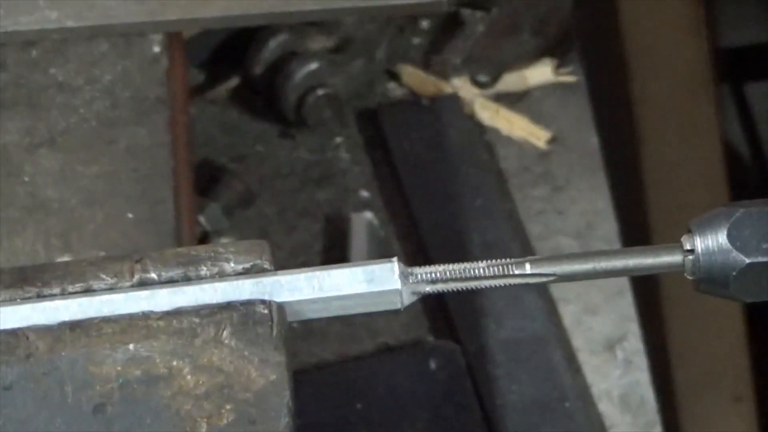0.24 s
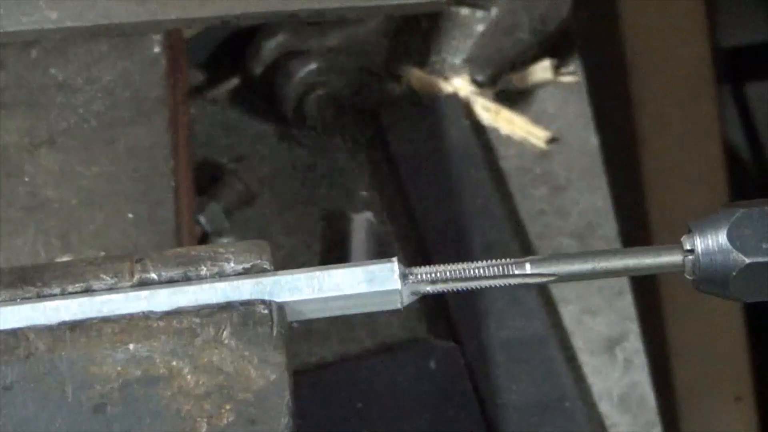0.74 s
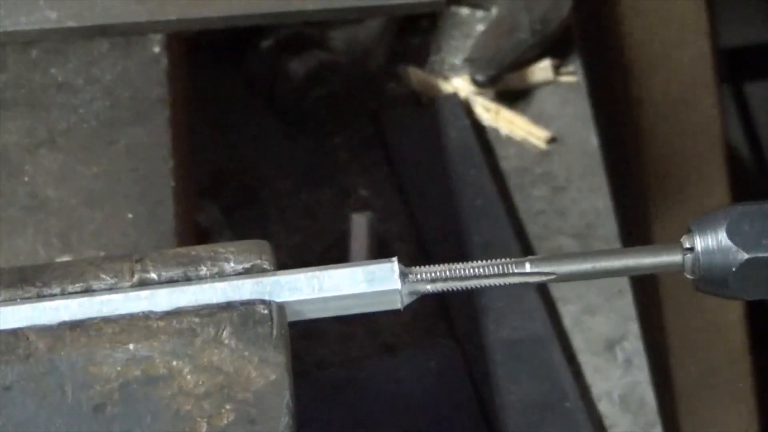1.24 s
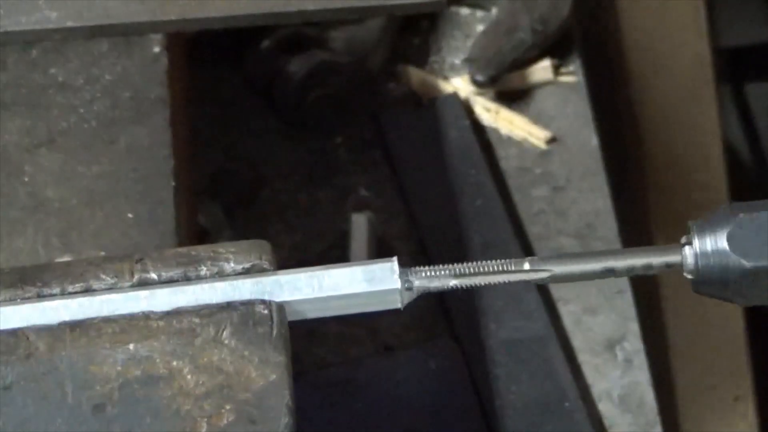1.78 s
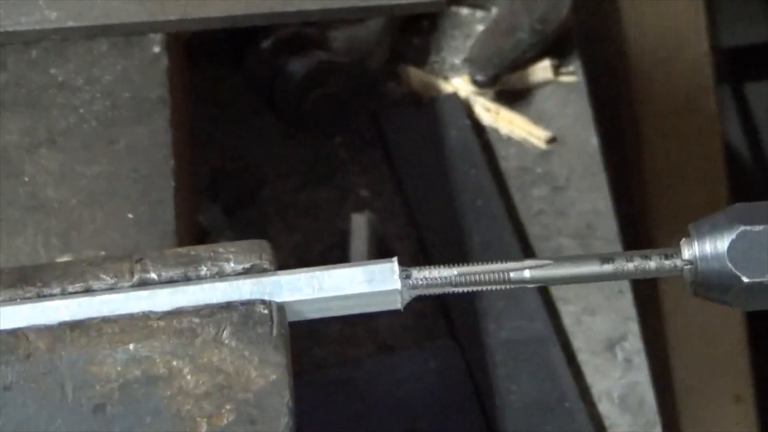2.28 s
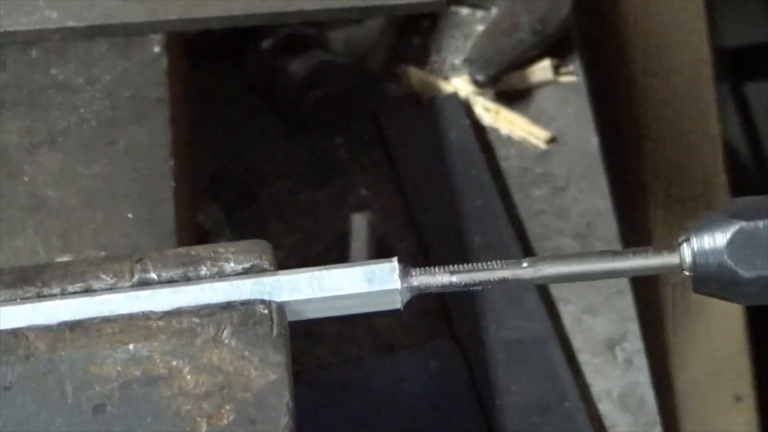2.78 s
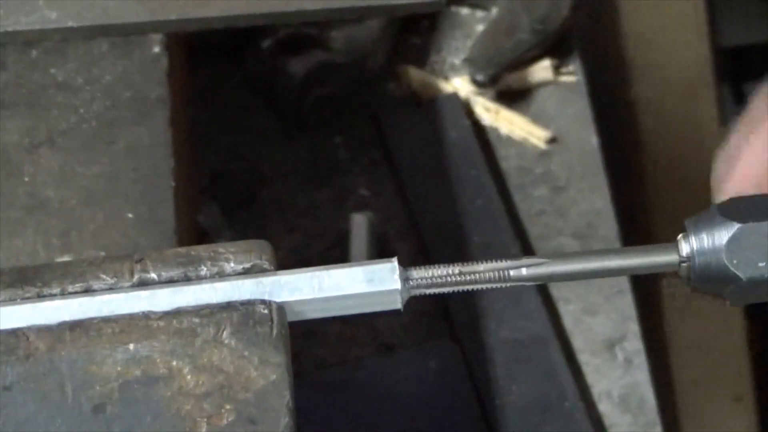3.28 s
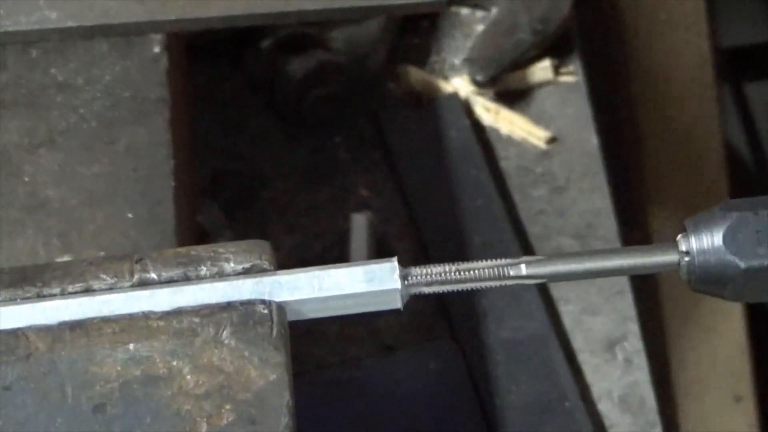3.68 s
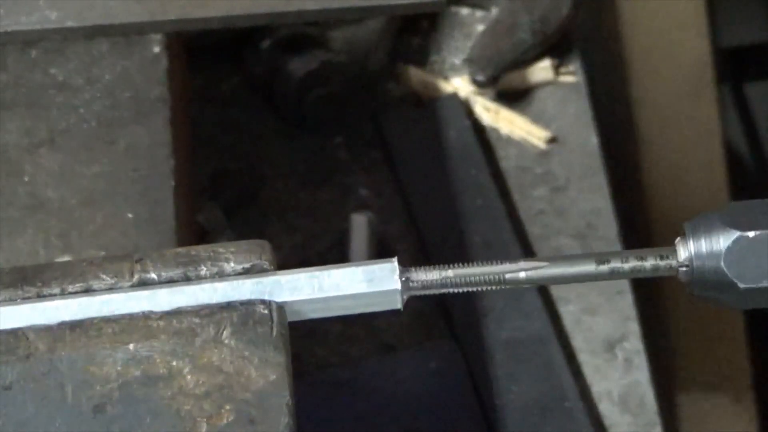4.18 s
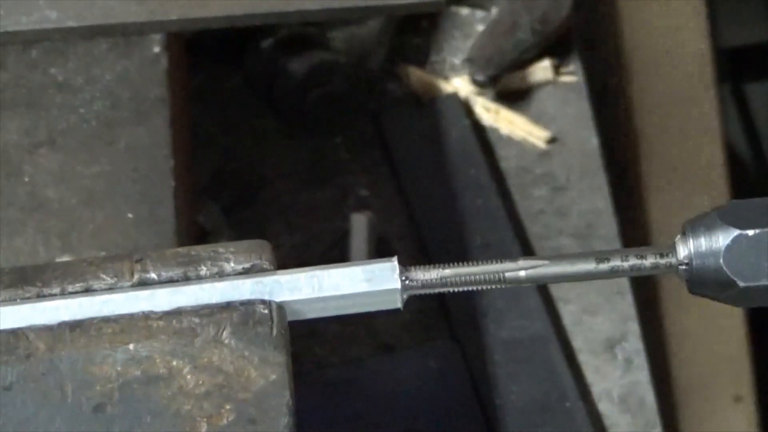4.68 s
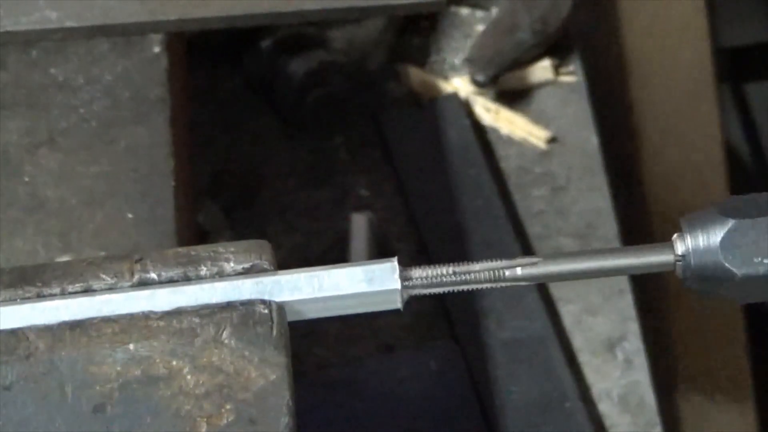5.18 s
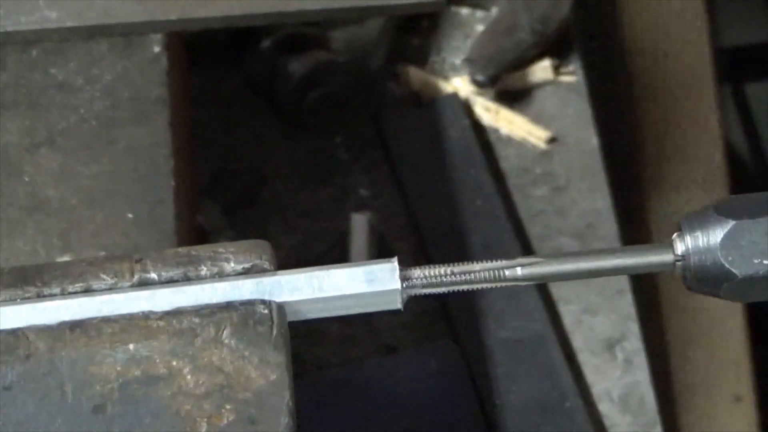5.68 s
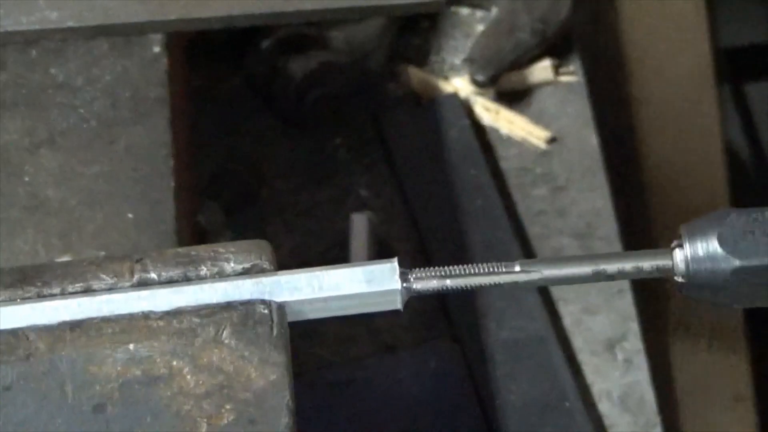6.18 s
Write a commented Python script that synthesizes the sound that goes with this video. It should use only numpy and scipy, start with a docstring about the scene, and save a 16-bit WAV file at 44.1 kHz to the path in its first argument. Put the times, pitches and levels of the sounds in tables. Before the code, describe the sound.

A dense burst of heavy steel clunks and bright clacks rings on a bench and vise in a live workshop, fading within half a second. A brief dry scrape swells and stops just after one second. Then a hand tap turns slowly in a steel rod: very quiet wrench knocks, small pings and chip snaps, over steady hiss and faint low rumble. Close stereo pickup, slightly dulled at the very top.

```python
"""Steel clunks and clatters on a workshop bench, as a hand tap is turned into a rod held in a vise.
Blows are fading coloured noise plus ringing modes; a dry slide is filtered grit, growing louder and brighter.
Then small sounds: the wrench knocks and the tap pings (runs of catches through modes), chips snap,
the flutes rub, the tap squeals. A drone, a low rumble, a hiss and a faint hum lie underneath."""
import sys
import numpy as np
from scipy import signal
from scipy.fft import rfft, irfft, next_fast_len
from scipy.io import wavfile
from scipy.ndimage import uniform_filter1d

SR = 44100
rng = np.random.default_rng(int(sys.argv[2]) if len(sys.argv) > 2 else 0)


def persist_wave(psi):
    """Save psi, clipped to +-1, as 16-bit WAV."""
    counts = np.round(np.clip(psi, -1, 1) * 32767).astype(np.int16)
    wavfile.write(sys.argv[1], SR, np.atleast_2d(counts).T)


N = 283915
T = np.arange(N) / SR
HIT_T = T[:SR // 2]

# heavy blows on the bench: (time [s], level [dB], treble tilt [dB/octave])
BLOWS = [(0.0003, -15, 0), (0.0045, -19.5, 0), (0.0085, -17.5, -1), (0.033, -24.5, -2.5),
         (0.062, -31.5, -0.5), (0.085, -29.5, -2), (0.104, -31, -1), (0.1114, -26, -1.5),
         (0.126, -27.5, -0.5), (0.141, -29, -1.5), (0.176, -36.5, -3), (0.201, -39, -1)]
# spectrum of a blow's crack: (frequency [Hz], level [dB])
BENCH_COLOUR = [(40, -37), (90, -16), (130, -10), (190, -15), (290, -5.5), (500, -10), (680, -9),
                (860, -10.5), (1100, -11.5), (1800, -8.5), (3200, -11), (6500, -12.5), (8500, -17.5),
                (11000, -33)]
# bench and vise modes: (frequency [Hz], level [dB], t60 [s])
BENCH_MODES = [(262.7, 7, 0.099), (335, -4.5, 0.14), (440, -9, 0.3), (650, -2, .11), (736, -11.5, .12),
               (1058, 0, 0.112), (1552, 0.5, 0.12), (1728, -2, 0.085), (2104, -4.5, .09),
               (2370, -0.5, 0.1013), (2680, -13, .12), (4290, -7.5, 0.13), (4510, -10.5, .14),
               (5270, -9, .12), (6365, -8.5, .14)]
# a harder blow rings the bench more: ring relative to crack for a blow of HARD_DB, and its change per dB
HARD_DB, BLOW_RING_DB, RING_DB_PER_DB = -16.5, -2, 0.9
BLOW_CRACK_T60_S = 0.11
# bench shudders at each landing: (time [s], level [dB])
SHUDDERS = [(0.0, -33), (0.106, -28.5)]
# shudder spectrum: (frequency [Hz], level [dB])
SHUDDER_COLOUR = [(60, -39.5), (135, -7.5), (200, -12), (280, -7.5), (360, -0.5), (450, -3), (560, -6.5),
                  (690, -6), (880, -15.5), (1050, -8), (1500, -19), (2500, -44.5)]
SHUDDER_ATTACK_S, SHUDDER_T60_S = 0.016, 0.39
# lean of the clatter: (frequency [Hz], left minus right [dB])
CLATTER_LEAN = [(190, -1), (340, -0.5), (600, 3), (1060, 0.5), (1900, 0), (6000, 0)]

# hard steel-on-steel clacks: (time [s], level [dB], ring relative to crack [dB], crack t60 [s])
CLACKS = [(0.1122, -30, -6.5, 0.02), (0.128, -27, -16, 0.024), (0.1782, -34, -20, 0.036),
          (0.2356, -32, -18, 0.026), (0.2454, -24, -12, 0.032), (0.2478, -31.5, -12, 0.21)]
# clack spectrum: (frequency [Hz], level [dB])
CLACK_COLOUR = [(150, -25), (300, -10), (700, -10), (1000, -7), (1400, -2.5), (1720, -10.5), (2000, 0.5),
                (2400, -9), (3050, -3.5), (3900, -10), (5500, -4.5), (6600, -6.5), (7800, -0.5),
                (11000, -25.5)]
# clacking steel modes: (frequency [Hz], level [dB], t60 [s])
STEEL_MODES = [(678, -9, 0.13), (1990, 5, 0.088), (2120, -4, 0.33), (2950, -18, 0.16), (3180, -11, 0.14),
               (4460, -5, 0.21), (5660, -5.5, 0.43), (7350, -7, .05), (7900, 3, 0.058)]

# dry sliding strokes: (start [s], length [s], final level [dB], final brightness [dB])
STROKES = [(0.632, 0.05, -56, -2.5), (1.011, .208, -38.7, .5)]
# scrape spectrum: (frequency [Hz], level [dB])
SLIDE_COLOUR = [(150, -45), (300, -28), (470, -22), (560, -11), (800, -11), (950, -7.5), (1300, -8),
                (1750, -3.5), (2200, -3), (2700, -1), (4200, -5.5), (4700, -7), (6100, -7), (8500, -13),
                (9400, -17.5), (11000, -24)]
# a stroke grips at once, grows louder and brighter as it speeds up, then runs out
GRIP_S, CLIMB_DB_PER_S, RUN_OUT_T60_S, BRIGHTEN_DB_PER_S = 0.016, 46, 0.31, 6

# wrench handle knocking in its play: (time [s], level [dB], contact time [s])
KNOCKS = [(0.766, -59, 0.018), (0.816, -67, .015), (0.899, -55, 0.019), (2.031, -55, 0.032),
          (2.1425, -50, .027), (2.232, -57, .027), (3.154, -60, 0.011), (3.3665, -50, .021),
          (3.463, -61, 0.011), (4.16, -54.5, .027), (4.379, -62, .016), (4.442, -59, .003),
          (5.268, -57, .025), (5.467, -53.5, .007), (5.541, -64, .012), (5.881, -64, .02),
          (6.426, -57.5, .013)]
# wrench modes before tilt: (frequency [Hz], level [dB], t60 [s])
WRENCH_MODES = [(1460, -10, 0.057), (1510, -3, 0.11), (1583, 2, 0.07), (1736, -1, 0.08), (1860, 2.5, 0.055),
                (2040, 2, 0.029), (2345, -11, 0.17), (2900, -8.5, 0.12), (4280, -20, 0.034),
                (7550, -20, .03)]
# tap freeing itself: (time [s], level [dB], contact time [s])
PINGS = [(1.664, -66.5, 0.02), (1.835, -64.5, 0.01), (2.6854, -55, .005), (2.885, -66, .023),
         (2.935, -66.5, .015), (3.154, -65, .005), (3.3655, -54, .0005), (3.7652, -61.5, .003),
         (3.925, -69.5, 0.018), (4.164, -63, .014), (5.0615, -55, .003), (5.139, -66, .003),
         (5.463, -61, .008), (5.885, -68, .002)]
# tap modes before tilt: (frequency [Hz], level [dB], t60 [s])
TAP_MODES = [(4320, -3, 0.041), (4342, -2.5, 0.029), (6910, -13, .025), (7900, -8, 0.03), (9600, -19, .025)]
# spectrum of the dry rattle after a slip, before tilt: (frequency [Hz], level [dB])
RATTLE_COLOUR = [(300, -38), (1150, -17), (1550, 1), (2200, -1.5), (3300, -8), (4400, -5), (6200, -12),
                 (7700, -1.5), (9000, -20), (11000, -28)]
REFERENCE_CONTACT_S = 0.01

# chips snapping: (time [s], level [dB], ring relative to crack [dB], crack t60 [s])
SNAPS = [(0.529, -63, 5, .02), (1.0298, -47, -13, 0.004), (1.529, -56, -18, 0.011),
         (5.7325, -59.5, 2.5, 0.024)]
# snap spectrum: (frequency [Hz], level [dB])
SNAP_COLOUR = [(500, -19), (2000, -11), (3000, 8), (5000, 5), (8000, 9), (11000, -6)]
# chip modes: (frequency [Hz], level [dB], t60 [s])
CHIP_MODES = [(2570, 29, 0.027), (2540, -23, .04), (3500, 9, 0.087), (7500, -28, .03)]

# tap binding and singing: (start [s], length [s], level [dB])
SQUEALS = [(2.633, .11, -71), (4.865, .28, -71.5)]
SQUEAL_HZ, SQUEAL_EDGE_S = 4340, 0.03
# flutes rubbing thinly in the hole: (time [s], level [dB], length [s])
RUBS = [(2.139, -66, 0.087), (2.545, -70, 0.039), (3.16, -70, .035)]
# flute rub spectrum: (frequency [Hz], level [dB])
RUB_COLOUR = [(6000, -23), (6850, -7), (7100, -14), (7550, 1), (7950, -23), (9000, -37)]

# soft rubbing as the wrench goes round: (frequency [Hz], level [dB])
BRUSH_COLOUR = [(150, -23), (260, -3), (350, 0.5), (560, -8.5), (780, -1.5), (1100, -12), (2500, -27)]
BRUSH_START_S, BRUSH_LENGTH_S, BRUSH_EDGE_S, BRUSH_DB = 2.364, 0.5, 0.17, -66.5
# faint squeak beside it; pitch rises and falls
SQUEAK_START_S, SQUEAK_LENGTH_S, SQUEAK_EDGE_S, SQUEAK_DB = 2.38, 0.26, 0.03, -80
SQUEAK_LOW_HZ, SQUEAK_HIGH_HZ, SQUEAK_PEAK_S, SQUEAK_WIDTH_S = 9150, 10030, 2.545, 0.07

# low drone; pitch rises and levels off
DRONE_START_S, DRONE_LENGTH_S, DRONE_EDGE_S, DRONE_DB = 2.38, 0.88, 0.27, -65.3
DRONE_FROM_HZ, DRONE_TO_HZ, DRONE_GLIDE_S = 52, 87, 0.32
# swells of dull rumble over a faint steady one: (start [s], length [s], level [dB])
RUMBLES = [(2.28, .24, -69.5), (3.18, 0.41, -65), (4.38, .22, -67.5), (5.35, .34, -67.5)]
# rumble spectrum: (frequency [Hz], level [dB])
RUMBLE_COLOUR = [(20, -22.5), (36, -6.5), (46, 0), (60, -2.5), (90, -15.5), (200, -47)]
RUMBLE_EDGE_S, RUMBLE_FLOOR_DB = 0.11, -79

# shop hiss spectrum: (frequency [Hz], level [dB])
AIR_COLOUR = [(15, -44), (25, -15), (54, -6.5), (124, -5), (152, -5), (235, -6.5), (372, -8), (492, -10),
              (840, -11), (1230, -14.5), (2270, -13.5), (2450, -15.5), (3410, -16), (4290, -15),
              (11000, -24), (14300, -58.5), (22000, -120)]
# humps on the hiss: (frequency [Hz], width [Hz], height [dB])
AIR_HUMPS = [(1200, 130, 5), (2482, 160, 6), (3130, 300, -0.5), (3770, 230, 2.5), (4900, 370, -1.5),
             (5570, 260, 7.5), (6400, 400, 0), (7950, 150, 3)]
AIR_DB = -62
# hum tones: (frequency [Hz], level [dB])
HUM = [(120, -77.5), (1030, -83)]

# room decay: (frequency [Hz], t60 [s])
ROOM_T60 = [(120, 1.28), (500, 0.63), (1300, 0.48), (2500, 0.82), (5500, 0.94), (8000, 1.03), (11000, 1.06)]
# room tail spectrum: (frequency [Hz], level [dB])
ROOM_COLOUR = [(100, -4.5), (500, -5), (1200, -4.5), (2200, 1.5), (3500, 1), (5500, 2.5), (6800, -0.5),
               (7800, -6.5), (9200, -2), (11000, -4)]
TOP_HZ = 11150


def undb(db):
    """Decibels to gain."""
    return 10 ** (np.asarray(db) / 20)


def unit(x):
    """Scale to rms 1."""
    return x / np.sqrt(np.mean(x ** 2))


def strength(x):
    """Scale a hit so that its energy equals that of 10 ms at rms 1."""
    return x / np.sqrt(np.sum(x ** 2, axis=-1).mean() / (SR / 100))


def at(points, hz):
    """Read (frequency, value) points on a log-frequency axis."""
    point_hz, value = np.transpose(points)
    return np.interp(np.log(hz + 1), np.log(point_hz), value)


def colour(x, points, tilt_db=0, humps=()):
    """Causal minimum-phase filter: spectrum, tilt per octave about 2 kHz, rounded humps."""
    size = next_fast_len(x.shape[-1] // 2 + 2048) * 2
    hz = np.fft.rfftfreq(size, 1 / SR)
    db = at(points, hz) + tilt_db * np.log2(np.maximum(hz, 300) / 2000)  # tilt is flat below 300 Hz
    db = db + sum(height_db * np.exp(-((hz - hump_hz) / width_hz) ** 2)
                  for hump_hz, width_hz, height_db in humps)
    # folding the cepstrum gives minimum phase
    cepstrum = irfft(np.log(undb(db)))
    cepstrum[1:size // 2] *= 2
    cepstrum[size // 2 + 1:] = 0
    response = np.exp(rfft(cepstrum))
    return irfft(rfft(x, size) * response)[..., :x.shape[-1]]


def fade(t_s, t60_s):
    """Exponential decay by 60 dB in t60."""
    return np.exp(-np.log(1000) * t_s / t60_s)


def swell(start_s, length_s, edge_s):
    """Attack, hold and release, with rounded edges."""
    from_edge_s = np.minimum(T - start_s, start_s + length_s - T)
    return np.sin(np.pi / 2 * np.clip(from_edge_s / edge_s, 0, 1))


def walk(rate_hz):
    """Slow random wander of rms 1: smoothed random steps."""
    step = int(SR / rate_hz)
    steps = np.repeat(rng.standard_normal(N // step + 1), step)
    return unit(uniform_filter1d(steps, step)[:N])


def tone(hz):
    """Sine of rms 1 following a varying frequency."""
    return unit(np.sin(2 * np.pi * np.cumsum(hz) / SR))


def spread(mid, side, side_db):
    """Left and right from mid and side."""
    return mid + undb(side_db) * side * np.array([[1], [-1]])


def add(out, time_s, sound):
    """Mix a sound in at its time."""
    i = max(int(time_s * SR), 0)
    out[:, i:i + sound.shape[-1]] += sound[..., :N - i]


def ring(modes, tilt_db=0, detune=0.0021):
    """Decaying modes, slightly detuned and random in sign at every contact."""
    hz, db, t60_s = np.transpose(modes)[:, :, None]
    hz = hz * (1 + detune * rng.standard_normal(hz.shape))
    sign = rng.choice([-1, 1], hz.shape)
    gain = sign * undb(db + tilt_db * np.log2(hz / hz[0]))
    return np.sum(gain * fade(HIT_T, t60_s) * np.sin(2 * np.pi * hz * HIT_T), axis=0)


def crack(points, t60_s, tilt_db=0, side_db=-12):
    """The crowd of short-lived modes that a blow wakes, as fading coloured noise."""
    noise = spread(*rng.standard_normal((2, len(HIT_T))), side_db)
    return strength(colour(noise * fade(HIT_T, t60_s), points, tilt_db))


def clatter():
    """Blows ring the bench and vise, which shudder on between them."""
    out = np.zeros((2, N))
    for time_s, db, tilt_db in BLOWS:
        ring_db = BLOW_RING_DB - RING_DB_PER_DB * (HARD_DB - db)
        ringing = undb(ring_db) * strength(ring(BENCH_MODES))
        cracking = crack(BENCH_COLOUR, BLOW_CRACK_T60_S, tilt_db, side_db=-8.5)
        add(out, time_s, undb(db) * (0 + strength(cracking + ringing)))
    out += shudder()
    left, right = out
    mid = (left + right) / 2
    # long waves reach both ears alike
    side = colour((left - right) / 2, [(60, -17), (200, -15), (700, -1.5)])
    return np.array([colour(mid + side, CLATTER_LEAN), mid - side])


def shudder():
    """Low coloured noise that builds up and dies away at each landing on the bench."""
    noise = spread(*rng.standard_normal((2, N)), side_db=-16)
    shaking = np.zeros(N)
    for time_s, db in SHUDDERS:
        attack = np.clip((T - time_s) / SHUDDER_ATTACK_S, 0, 1)
        decay = fade(np.maximum(T - time_s - SHUDDER_ATTACK_S, 0), SHUDDER_T60_S)
        shaking += undb(db) * attack * decay
    return unit(colour(noise, SHUDDER_COLOUR)) * shaking


def hard_hits(table, points, modes):
    """Short cracks, each with the ring of the metal."""
    out = np.zeros((2, N))
    for time_s, db, ring_db, t60_s in table:
        ringing = undb(ring_db) * strength(ring(modes))
        add(out, time_s, undb(db) * (crack(points, t60_s) + ringing))
    return out


def slide(grain_db=3.0):
    """Dense grit under a sliding surface, louder and brighter as it speeds up."""
    sizes = undb(grain_db * np.minimum(rng.exponential(size=N), 4))
    grains = spread(*(rng.standard_normal((2, N)) * sizes), side_db=-11.5)
    scrape = unit(colour(grains, SLIDE_COLOUR))
    low = signal.sosfilt(signal.butter(1, 3500, fs=SR, output="sos"), scrape)
    high = scrape - low
    out = np.zeros((2, N))
    for start_s, length_s, db, final_bright_db in STROKES:
        end_s = start_s + length_s
        to_go_s = np.clip(end_s - T, 0, length_s)
        grip = np.clip((T - start_s) / GRIP_S, 0, 1)
        climb = undb(db - CLIMB_DB_PER_S * to_go_s)
        run_out = fade(np.maximum(T - end_s, 0), RUN_OUT_T60_S)
        bright_db = final_bright_db - BRIGHTEN_DB_PER_S * to_go_s
        out += grip * climb * run_out * (low * undb(-bright_db) + high * undb(2 * bright_db))
    return out


def slips(table, modes, bright_db, dulling_db, rattle_db, rattle_t60_s, detune):
    """A quick run of tiny catches rings one steel part, with a dry rattle.

    Each doubling of contact time lowers the tilt by dulling_db per octave.
    """
    out = np.zeros((2, N))
    for time_s, db, contact_s in table:
        tilt_db = bright_db - dulling_db * np.log2(contact_s / REFERENCE_CONTACT_S)
        catches = rng.standard_normal(len(HIT_T)) * np.exp(-(HIT_T / contact_s) ** 2)
        ringing = signal.fftconvolve(catches, ring(modes, tilt_db, detune))
        body = strength(ringing[:len(HIT_T)])
        rattle = crack(RATTLE_COLOUR, rattle_t60_s + 4 * contact_s, tilt_db, side_db=-8)
        add(out, time_s, undb(db) * (body + undb(rattle_db) * rattle))
    return out


def squeal():
    """Steady friction keeps a low mode of the tap singing, a little unevenly."""
    hz = SQUEAL_HZ * (1 + 0.006 * walk(250))
    binding = sum(undb(db) * swell(start_s, length_s, SQUEAL_EDGE_S) for start_s, length_s, db in SQUEALS)
    return tone(hz) * binding * undb(2 * walk(60))


def rubs():
    """Brief thin rubs of the flutes: narrow-coloured noise."""
    out = np.zeros((2, N))
    for time_s, db, length_s in RUBS:
        envelope = signal.windows.tukey(int(length_s * SR), 0.5)
        noise = unit(colour(rng.standard_normal(len(envelope)), RUB_COLOUR))
        add(out, time_s, undb(db) * envelope * noise)
    return out


def brush(uneven_db=1.5):
    """Soft uneven rubbing of coloured noise with a thin arching squeak."""
    rubbing = unit(colour(rng.standard_normal(N), BRUSH_COLOUR)) * undb(BRUSH_DB)
    rubbing = rubbing * swell(BRUSH_START_S, BRUSH_LENGTH_S, BRUSH_EDGE_S)
    arch = np.exp(-((T - SQUEAK_PEAK_S) / SQUEAK_WIDTH_S) ** 2)
    squeak = tone(SQUEAK_LOW_HZ + (SQUEAK_HIGH_HZ - SQUEAK_LOW_HZ) * arch) * undb(SQUEAK_DB)
    squeak = squeak * swell(SQUEAK_START_S, SQUEAK_LENGTH_S, SQUEAK_EDGE_S)
    return (rubbing + squeak) * undb(uneven_db * walk(40))


def drone(waver_db=2.0):
    """One swell of a low wavering tone gliding up to its final pitch."""
    glide = np.exp(-np.maximum(T - DRONE_START_S, 0) / DRONE_GLIDE_S)
    hz = DRONE_TO_HZ + (DRONE_FROM_HZ - DRONE_TO_HZ) * glide
    hz = hz * (1 + 0.025 * walk(20))
    level = undb(DRONE_DB + waver_db * walk(9.9))
    return tone(hz) * level * swell(DRONE_START_S, DRONE_LENGTH_S, DRONE_EDGE_S)


def rumble():
    """Low coloured noise, the same in both ears, swelling over a faint floor."""
    surges = sum(undb(db) * swell(start_s, length_s, RUMBLE_EDGE_S) for start_s, length_s, db in RUMBLES)
    return unit(colour(rng.standard_normal(N), RUMBLE_COLOUR)) * (undb(RUMBLE_FLOOR_DB) + surges)


def air():
    """Steady hiss of coloured noise, narrow in the bass."""
    mid, side = rng.standard_normal((2, N))
    side = colour(side, [(60, -15), (300, 2.5), (1200, 5.5), (9000, -2.5)])
    return unit(colour(spread(mid, side, side_db=-6), AIR_COLOUR, humps=AIR_HUMPS)) * undb(AIR_DB)


def hum():
    """Faint steady tones wavering in level."""
    return sum(undb(db + 2 * walk(5.6)) * unit(np.sin(2 * np.pi * hz * T)) for hz, db in HUM)


def room(x, wet_db, build_s=0.013):
    """A diffuse tail that builds up quickly and dies at its own pace in each half octave."""
    t_s = T[:SR]
    hz = np.fft.rfftfreq(SR, 1 / SR)
    noise = rfft(spread(*rng.standard_normal((2, SR)), side_db=-7.5))
    band_hz = 2 ** (np.round(2 * np.log2(np.clip(hz, 128, 11000))) / 2)
    tail = sum(irfft(noise * (band_hz == centre_hz)) * fade(t_s, at(ROOM_T60, centre_hz))
               for centre_hz in np.unique(band_hz))
    tail = colour(tail * (1 - np.exp(-t_s / build_s)), ROOM_COLOUR)
    tail = unit(tail) / np.sqrt(SR)  # unit energy
    return x + undb(wet_db) * signal.fftconvolve(x, tail, axes=1)[:, :N]


def scene():
    """Clatter, slide and tool sounds in one room, over dry drone, rumble, hiss and hum."""
    clacks = hard_hits(CLACKS, CLACK_COLOUR, STEEL_MODES)
    wrench = slips(KNOCKS, WRENCH_MODES, bright_db=-2.0, dulling_db=0.0,
                   rattle_db=-6, rattle_t60_s=0.081, detune=0.0055)
    pings = slips(PINGS, TAP_MODES, bright_db=-12.5, dulling_db=4.0,
                  rattle_db=-10.5, rattle_t60_s=0.019, detune=0.0031)
    snaps = hard_hits(SNAPS, SNAP_COLOUR, CHIP_MODES)
    tool = wrench + pings + squeal() + rubs() + brush() + snaps
    loud = room(clatter(), wet_db=-13.5) + room(clacks, wet_db=-19.5)
    small = room(slide(), wet_db=-14.0) + room(tool, wet_db=-12.5)
    return loud + small + drone() + rumble() + air() + hum()


def record(dry):
    """A steep low-pass removes the top octave."""
    return signal.sosfilt(signal.ellip(10, 0.2, 70, TOP_HZ, fs=SR, output="sos"), dry)


dry = scene()
out = record(dry)
persist_wave(out)
```